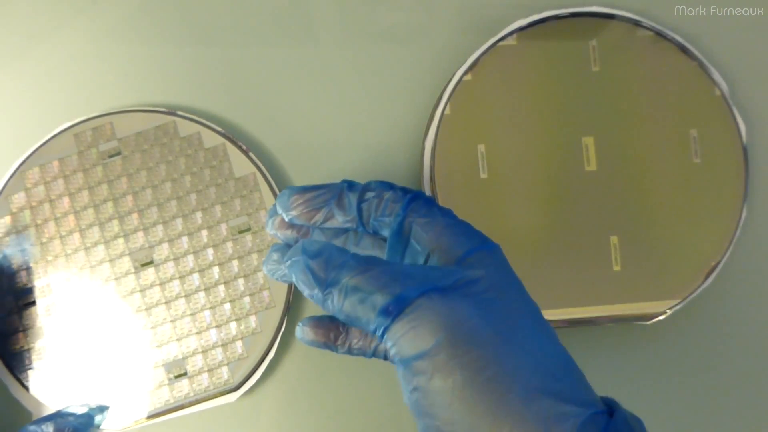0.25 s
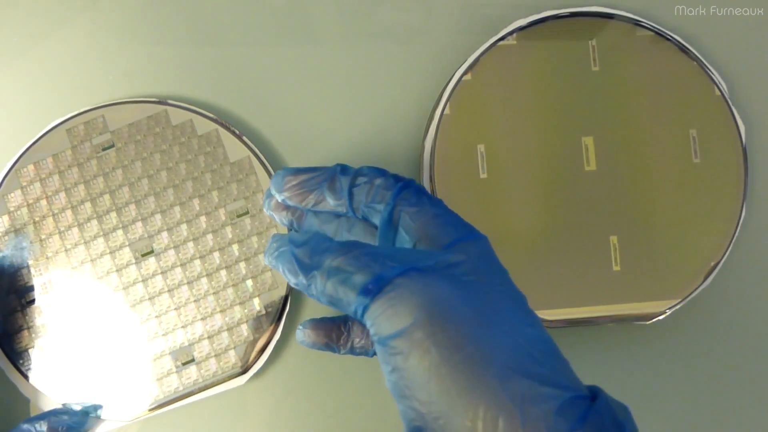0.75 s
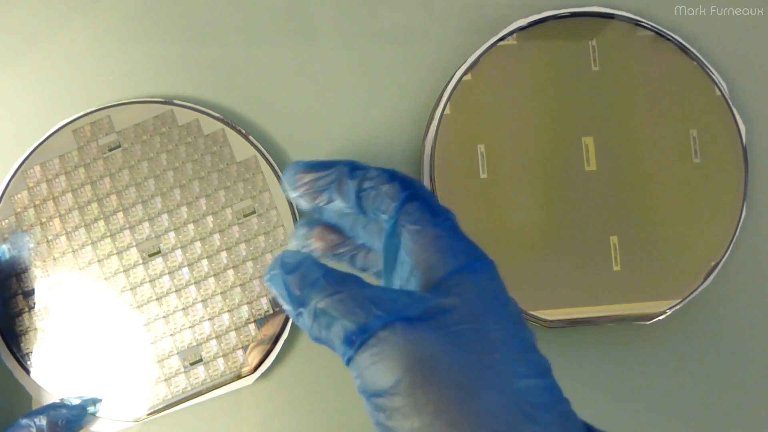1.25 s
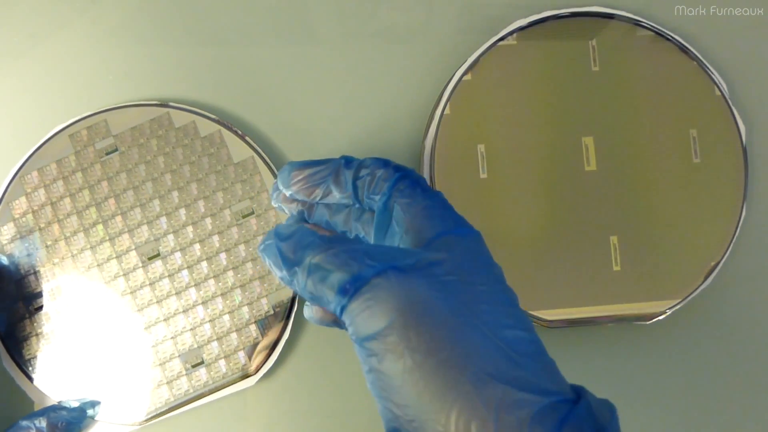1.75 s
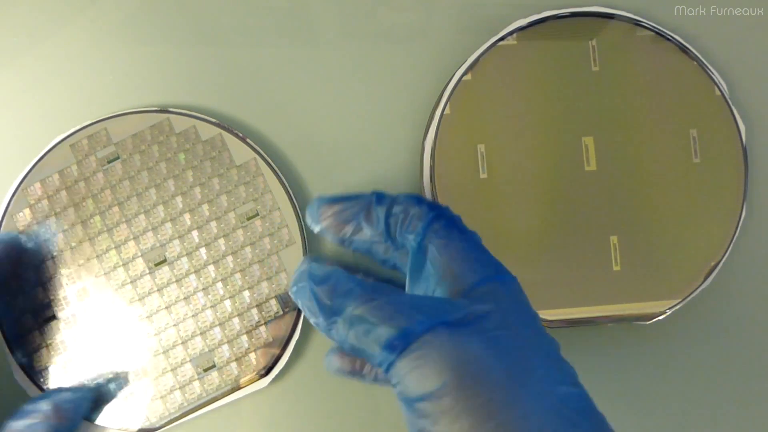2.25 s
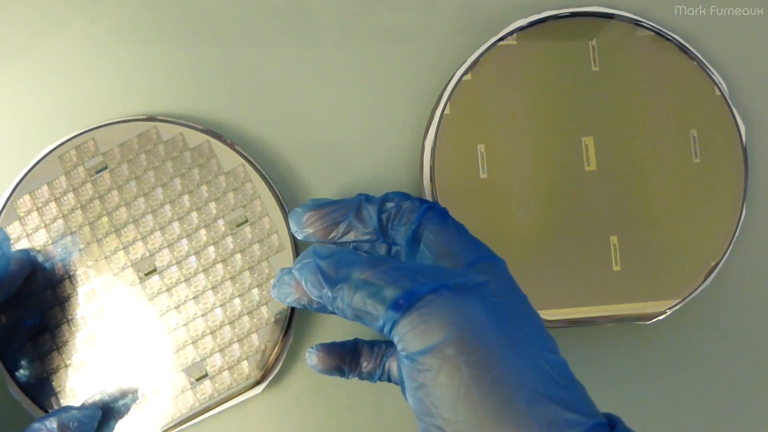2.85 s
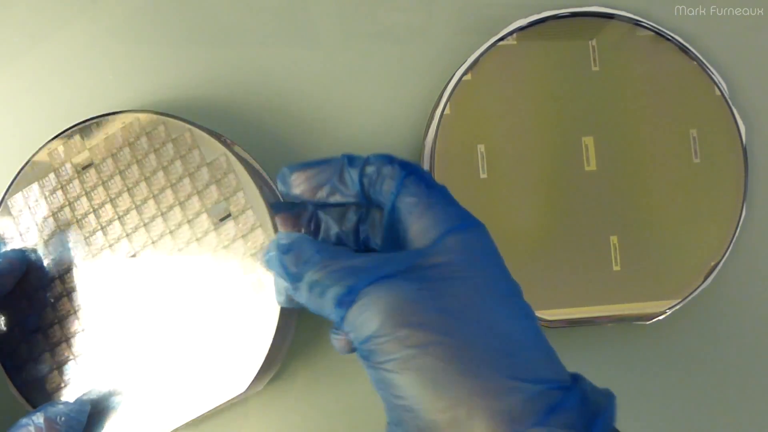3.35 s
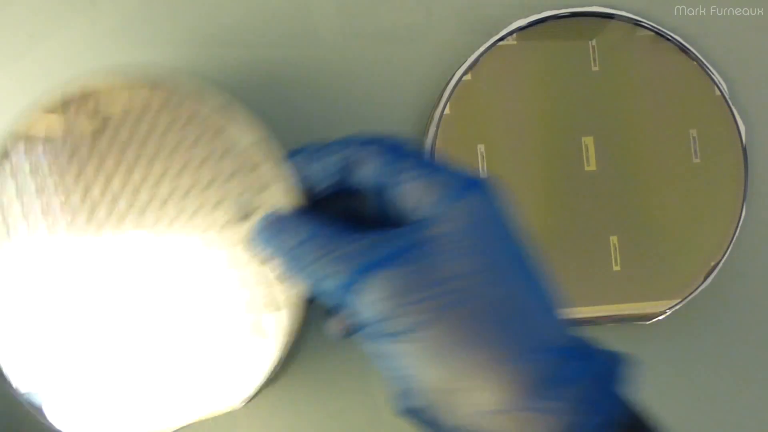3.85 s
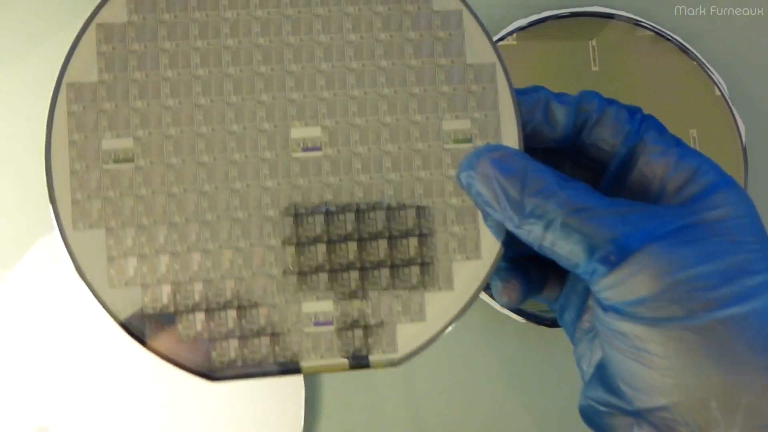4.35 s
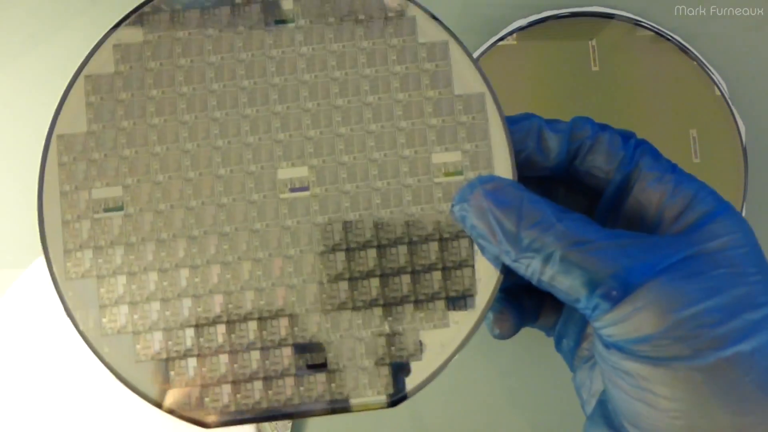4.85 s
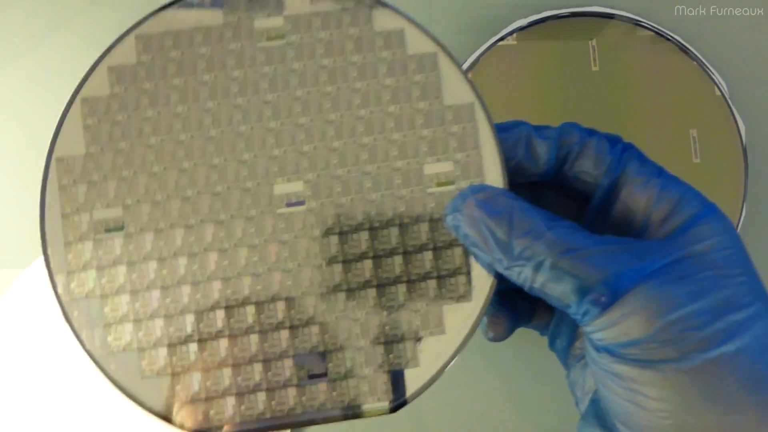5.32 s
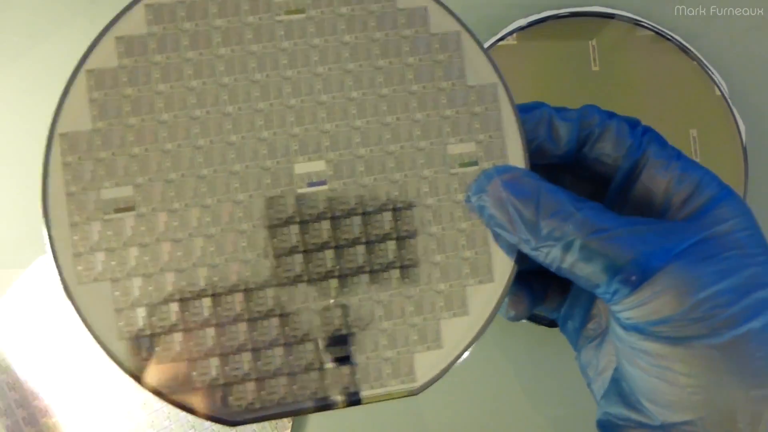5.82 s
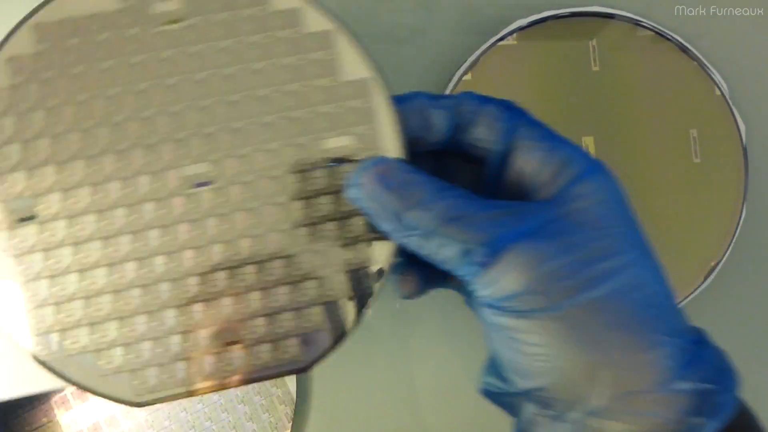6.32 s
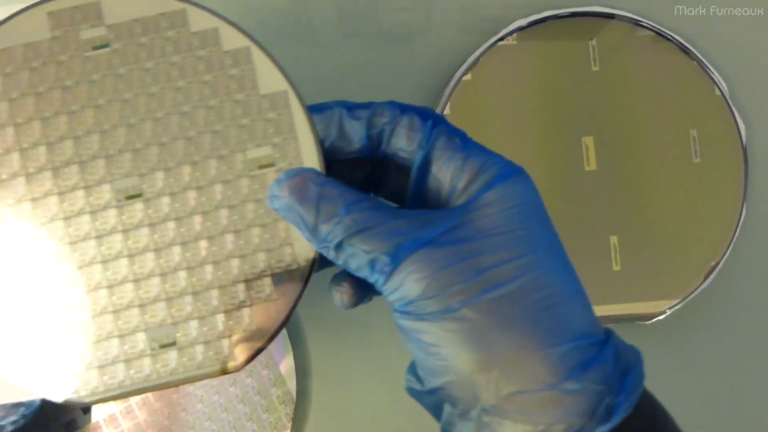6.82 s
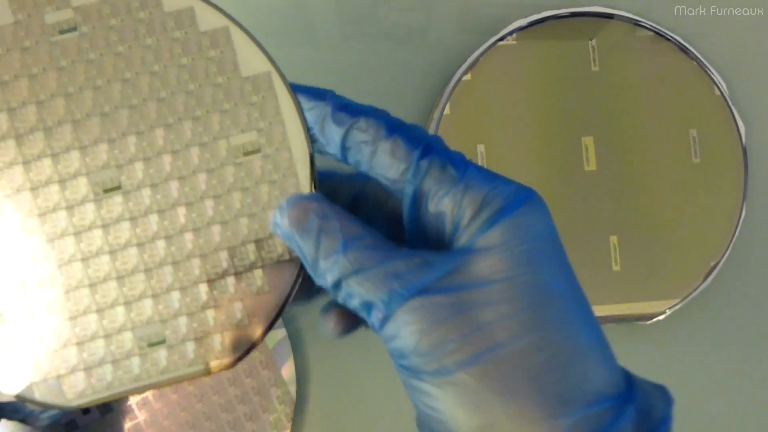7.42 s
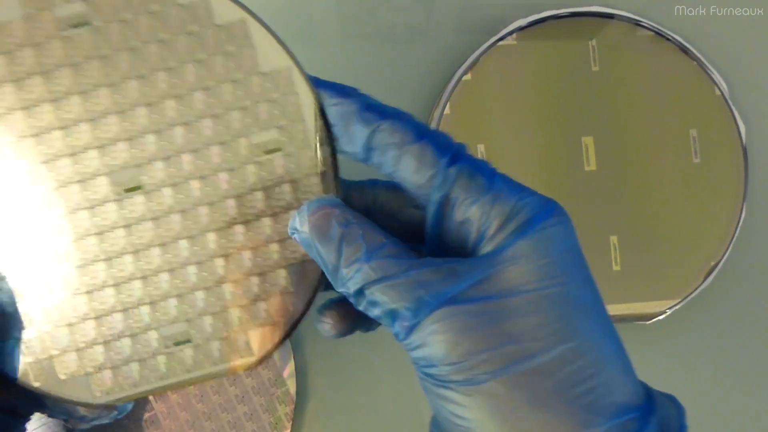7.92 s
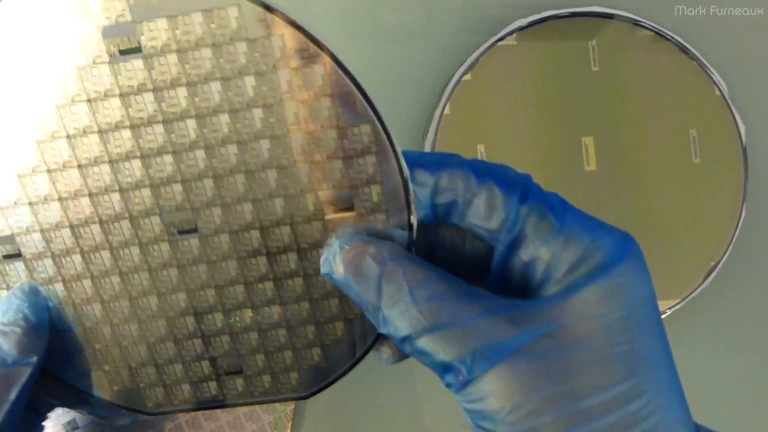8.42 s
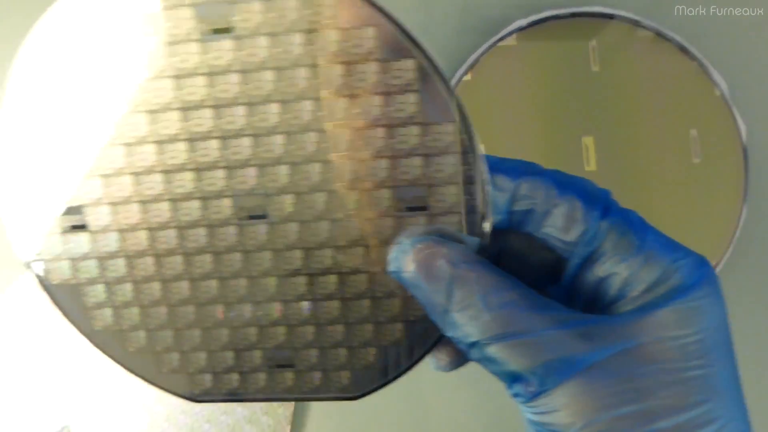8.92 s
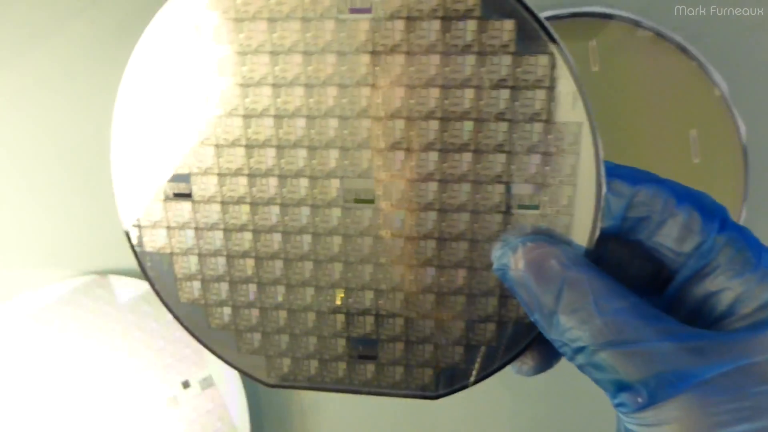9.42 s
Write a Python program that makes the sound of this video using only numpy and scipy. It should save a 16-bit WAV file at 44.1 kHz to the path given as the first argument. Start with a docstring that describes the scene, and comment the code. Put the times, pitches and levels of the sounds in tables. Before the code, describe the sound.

A small, fairly dry indoor space with deep rumble, low wavering mains hum and soft wide hiss throughout. Nothing else until about 0.8 s, when a thin plastic glove gives a quick crisp rustle against a silicon wafer. Soft rubs and a dull tap follow to 1.6 s, a brighter brush at 1.8 and a gentle slide around 2.3. Small ticks come near 2.8, then a cluster of crinkles, scrapes and taps from 3.1 to 4.1 as the wafer is lifted. A strong crackly brush lands at 4.6, sharp knocks at 5.0 and 5.2, and a crisp glove slide at 5.4-5.7. Faint rubs lead to a knock at 6.5 and longer rustling until 7.2. Lighter brushes and ticks continue, with a clear click at 8.9, while a low drone swells around 8 s, then recedes to the end near 9.7.

```python
"""A room rumbles, hums and hisses throughout, made from shaped noise and wavering sine tones.
From about 0.8 s a hand in a thin plastic glove slides a silicon wafer off its tray and turns it:
each rub is a dense run of tiny slips that sound in the glove film, the wafer and the tray.
From 1.3 s single creases and taps snap in between, each a short ring with a crack of noise.
A low drone swells to its loudest near 8 s and sinks again as the last rubs pass."""
import sys
import numpy as np
from scipy import signal
from scipy.fft import rfft, irfft, next_fast_len
from scipy.io import wavfile
from scipy.ndimage import uniform_filter1d

SR = 44100
rng = np.random.default_rng(int(sys.argv[2]) if len(sys.argv) > 2 else 0)


def to_wav(s):
    """Save 16-bit WAV."""
    ch = np.atleast_2d(s).T  # columns
    pcm = np.round(np.clip(ch, -1, 1) * 32767)  # PCM
    wavfile.write(sys.argv[1], SR, pcm.astype(np.int16))


N = 426447  # length in samples, about 9.7 s


def gain_of(db):
    """Turns decibels into a plain multiplier."""
    return 10 ** (np.asarray(db) / 20)


def evened(x):
    """Scales a signal to an average (rms) level of one."""
    return x / np.sqrt(np.mean(x ** 2) + 1e-20)


def read(points, hz):
    """Reads a curve of (pitch, value) points, spacing pitch as the ear does."""
    f, value = np.transpose(points)
    return np.interp(np.log(hz + 1), np.log(f + 1), value)


def follow(rows):
    """Joins curve rows into one value a sample, for each column after the time."""
    s, *columns = np.transpose(rows)
    return [np.interp(np.arange(N) / SR, s, column) for column in columns]


def resonate(x, hz, width):
    """Shifts hz down to zero, smooths, and shifts back: a resonance of gain 1."""
    turn = np.exp(2j * np.pi * np.cumsum(hz * np.ones(len(x))) / SR)
    r = np.exp(-np.pi * width / SR)
    return 2 * (turn * signal.lfilter([1 - r], [1, -r], x / turn)).real


def add(mix, s, sound):
    """Mixes a sound in at s seconds, cut off at the end of the scene."""
    part = mix[:, round(s * SR):][:, :sound.shape[1]]
    part += sound[:, :part.shape[1]]


RUMBLE_DB = -41.5  # overall level
# how the rumble's strength is spread over pitch: pitch_hz, relative level_db (per Hz)
RUMBLE_SHAPE = [(5, 14), (18, 18.5), (27, 4), (40, -28), (60, -53)]


def rumble():
    """The building's lowest shaking: shaped noise, the same at both microphones."""
    size = next_fast_len(N)
    hz = np.fft.rfftfreq(size, 1 / SR)
    shaped = rfft(rng.standard_normal(size)) * gain_of(read(RUMBLE_SHAPE, hz))
    return gain_of(RUMBLE_DB) * evened(irfft(shaped, size)[:N])


AIR_DB = -52.5  # overall level
# how room noise and hiss are spread over pitch: pitch_hz, relative level_db (per Hz)
AIR_SHAPE = [(40, -11), (60, -2.5), (105, -13), (135, -11.5), (190, -17), (260, -15.5), (390, -24.5),
             (460, -23.5), (640, -29.5), (1150, -31), (2200, -40.5), (16000, -45.5)]
# how alike left and right are: pitch_hz, likeness (0 unrelated, 1 the same)
LIKENESS = [(130, 0.99), (400, 0.93), (1000, 0.74), (3000, 0), (7000, 0)]


def air(patchy_db=0.5):
    """Room noise over the hiss of the microphones: alike in the bass, unrelated in the treble."""
    frames, hz = N // 512 + 5, np.fft.rfftfreq(2048, 1 / SR)
    a, b, c, d, patches = rng.standard_normal((frames, len(hz), 5)).T
    # the level varies slightly in patches about 340 Hz wide and 0.09 s long
    patches = evened(uniform_filter1d(uniform_filter1d(patches, 16, 0), 8, 1))
    same = np.clip(read(LIKENESS, hz), -1, 1)[:, None]
    left = a + 1j * b
    right = same * left + np.sqrt(1 - same ** 2) * (c + 1j * d)
    spectrum = np.array([left, right])
    spectrum *= gain_of(read(AIR_SHAPE, hz)[:, None] + patchy_db * patches)
    noise = signal.istft(spectrum, nperseg=2048, noverlap=1536)[1][:, :N]
    return gain_of(AIR_DB) * evened(noise)


# wavering mains hum and a higher tone: pitch_hz, width_hz, level_db
HUMS = [(59.25, 6.1, -57), (460.6, 4, -73.5)]
# path of the drone, before its level wavers: time_s, pitch_hz, level_db
DRONE = [(0, 134.7, -62.5), (1.4, 143, -61.5), (2.3, 114.6, -59.5), (3.9, 140.7, -61), (6.6, 138, -59.5),
         (7.3, 138.1, -52), (8.1, 136.1, -49), (8.9, 137.1, -53.5), (9.67, 140.3, -58.5)]


def hum(steady=1.4, waver_db=1.84):
    """A gliding drone, plus tones that waver because each sine has narrow noise around it."""
    t = np.arange(N) / SR
    drone_hz, drone_db = follow(DRONE)
    waver = evened(uniform_filter1d(rng.standard_normal(N), 5000))
    drone = np.sqrt(2) * np.sin(2 * np.pi * np.cumsum(drone_hz) / SR)
    out = gain_of(drone_db + waver_db * waver) * drone
    for hz, width, db in HUMS:
        fuzz = evened(resonate(resonate(rng.standard_normal(N), hz, width), hz, width))
        out += gain_of(db) * evened(fuzz + steady * np.sin(2 * np.pi * hz * t))
    return out


def bench(x, t60=0.053, wet_db=-4.5, lead_s=4.5e-5, scatter_s=2.5e-5, left_db=0.7):
    """Left hears the hand louder and usually first; lead and echoes are drawn for each sound."""
    t = np.arange(4096) / SR
    taps = rng.standard_normal((2, len(t))) * gain_of(-60 * t / t60) * (t > .001)
    taps *= gain_of(wet_db) / np.linalg.norm(taps, axis=1, keepdims=True)
    lead = (lead_s + scatter_s * rng.standard_normal()) * SR
    # direct sound: a smooth click can sit between two samples; 16 samples of room are cut below
    taps[:, :32] += np.sinc(np.arange(32) - 16 - np.array([[0], [lead]]))
    sides = gain_of([[left_db / 2], [-left_db / 2]])
    return signal.fftconvolve(x[None], taps, axes=1)[:, 16:] * sides


# creases and taps, before the echoes:
# start_s, ring level_db, ring pitch_hz, lowest partial's 60 dB fade_s (before rattle), crack level_db
SNAPS = [(1.3364, -47, 1060, 0.03, -66), (1.796, -56, 3600, .03, -49), (2.79, -44.5, 2420, 0.021, -64),
         (2.861, -61, 3350, 0.025, -49), (3.436, -45, 1110, 0.012, -55), (3.544, -47, 5700, 0.068, -63),
         (4.076, -50, 5770, 0.039, -45), (4.966, -43.5, 1150, 0.017, -52), (5.204, -42, 1240, 0.02, -37.5),
         (5.385, -47, 2480, 0.011, -58), (5.41, -48, 245, 0.06, -50), (6.491, -42, 950, 0.05, -48.5),
         (6.704, -54, 1160, .04, -60), (6.752, -48, 820, 0.073, -62), (7.826, -47.5, 993, 0.09, -51),
         (8.141, -66, 7010, 0.014, -49.5), (8.191, -75, 2500, 0.013, -49), (8.899, -44, 3940, 0.014, -40.5)]


def snaps(partials=((1, 0), (1.63, -9.), (2.08, -6.)), crack_t60=0.03, rattle_hz=706.0,
          rattle_s=0.00203):
    """A short, rattling ring of partials (ratio, dB), with a crack that dies at least as fast
    as the lowest of them."""
    out, t = np.zeros((2, N)), np.arange(3000) / SR
    noise = signal.lfilter([1, -.3], 1, rng.standard_normal((len(SNAPS), len(t))))
    for (s, ring_db, hz, t60, crack_db), hiss in zip(SNAPS, noise):
        ring = sum(gain_of(db - 60 * ratio * t / t60) * np.sin(2 * np.pi * ratio * hz * t)
                   for ratio, db in partials)
        rough = rattle_hz / (rattle_hz + hz)  # low knocks rattle, high ticks ring clear
        rattle = evened(uniform_filter1d(hiss[::-1], round(rattle_s * SR)))
        ring = ring * (1 - rough + rough * rattle)
        crack = gain_of(crack_db - 60 * t / min(t60, crack_t60)) * hiss
        add(out, s, bench(gain_of(ring_db) * ring + crack))
    return out


def slips(per_s, spread_db, clump_db):
    """Stick-slip clicks of random sign and size that come in clumps of some milliseconds."""
    size = gain_of(spread_db * np.minimum(rng.exponential(1, N), 5)) * rng.choice([-1, 1], N)
    clumps = evened(uniform_filter1d(rng.standard_normal(N), 500))
    happens = rng.random(N) < per_s / SR
    return evened(size * happens * gain_of(clump_db * clumps))


def body(hz, modes):
    """Power response of a rubbed thing: steep resonances, scaled to a mean of one."""
    power = sum(gain_of(2 * db) / (1 + (2 * (hz - f) / w) ** 2) ** 2 for f, w, db in modes)
    return power / power.mean()


MID_GRIP_HZ = 3680  # middling pitch of the gripped wafer
# the tray follows the wafer's level, more so when the grip is low
TRAY_DB, TRAY_DB_PER_OCTAVE = -12, -8
LINGER = 0.98  # shape of the fall: 1 even in dB, 2 bell-like
# short brushes of a finger, before the bodies and echoes:
# peak_s, rise_s, fall_s, glove film level_db, wafer level_db, gripped wafer pitch_hz
BRUSHES = [(.955, 0.012, 0.015, -77, -67, 3750), (1.04, 0.007, 0.31, -63, -69.5, 4500),
           (1.191, 0.062, 0.032, -56.5, -61.5, 3600), (1.309, 0.03, 0.013, -56, -64, 8700),
           (1.395, 0.036, 0.05, -61.5, -60, 3870), (1.544, 0.025, 0.035, -85, -64, 3670),
           (1.823, 0.018, 0.025, -56, -53.5, 3680), (2.022, 0.073, 0.17, -66, -64, 7150),
           (2.473, 0.032, .026, -56.5, -65.5, 8050), (3.139, 0.032, 0.077, -65, -64, 4680),
           (3.226, 0.057, 0.027, -57, -57.5, 3730), (3.349, 0.059, 0.059, -59, -59.5, 4360),
           (3.451, .028, 0.021, -50.5, -56.5, 4140), (3.561, 0.036, 0.054, -61.5, -55.5, 5740),
           (3.64, 0.04, 0.092, -56.5, -64.5, 2390), (3.76, 0.027, 0.063, -66, -70, 6000),
           (3.987, 0.078, 0.081, -62, -63.5, 8400), (4.081, 0.005, 0.063, -59, -67, 5700),
           (4.565, 0.029, 0.035, -59, -48.5, 3400), (4.583, .03, 0.025, -45.5, -46, 5500),
           (4.751, 0.05, 0.023, -63.5, -61, 3340), (4.891, 0.032, 0.16, -62.5, -62, 3420),
           (5.212, 0.021, 0.036, -52, -58, 2650), (5.846, 0.013, 0.013, -72, -60.5, 2650),
           (5.909, 0.017, 0.027, -78, -63.5, 2580), (6.001, 0.024, 0.019, -65, -55.5, 2250),
           (6.15, 0.019, 0.03, -80, -68, 2000), (6.872, 0.01, 0.007, -49, -56.5, 4520),
           (6.925, 0.005, 0.0096, -68, -56, 4270), (7.687, 0.055, 0.048, -57, -55.5, 5240),
           (7.939, 0.037, 0.021, -66, -62, 2560), (8.48, 0.057, .016, -64, -59, 6430),
           (8.781, 0.081, 0.042, -55, -58.5, 4970), (8.92, 0.015, 0.013, -68, -58, 4200),
           (9.204, 0.034, 0.036, -70, -63.5, 3360)]


def brush(s, rise, fall, film_db, wafer_db, grip_hz):
    """A quick swell and a fade, 10 dB down a rise or fall away, shared by film, wafer and tray."""
    t = np.arange(-2 * rise, 3 * fall, 1 / SR)
    swell_db = -10 * np.where(t < 0, (t / rise) ** 2, abs(t / fall) ** LINGER)
    tray_db = wafer_db + TRAY_DB + TRAY_DB_PER_OCTAVE * np.log2(grip_hz / MID_GRIP_HZ)
    levels = gain_of(swell_db + np.array([[film_db], [wafer_db], [tray_db]]))
    return [(s + t[0], levels, grip_hz)]


TOUCH_S = 0.002  # a slide fades in and out over this time
SHIFT_S = .06  # a sliding hand finds new spots this often
# long slides of the hand, before the bodies and echoes: middle pitch_hz of the gripped wafer,
# its wander_octaves from spot to spot, then a path of
# (time_s, glove film level_db, wafer level_db, tray level_db)
SLIDES = [(8200, 0.11, [(0.825, -66, -68, -68), (0.835, -55, -56, -67), (0.891, -51, -61, -77),
          (1.03, -84, -87, -84)]), (3600, 0.39, [(2.178, -60.5, -75, -71), (2.304, -53.5, -61.5, -75),
          (2.38, -63, -86, -87)]), (5360, .03, [(4.15, -72, -80, -77), (4.196, -62.5, -62, -91),
          (4.378, -63.5, -63, -73), (4.5, -72, -61, -73), (4.53, -75, -77, -66)]),
          (4350, 0.32, [(5.41, -67, -72, -67), (5.424, -52.5, -67, -70), (5.48, -45.5, -60, -65.5),
          (5.538, -63, -70, -69), (5.566, -56.5, -62, -75), (5.638, -51.5, -63, -69),
          (5.69, -56.5, -69, -72), (5.73, -70, -72, -73)]), (4480, 0.31, [(6.51, -67, -74, -69),
          (6.56, -58.5, -68, -70), (6.622, -63.5, -68, -66.5), (6.76, -54.5, -63, -67),
          (7.05, -58, -62, -72), (7.11, -68, -70, -79), (7.142, -60.5, -64, -91), (7.216, -65, -85, -94)]),
          (4830, 0.12, [(7.425, -61, -68, -95), (7.564, -59, -60.5, -80), (7.62, -72, -72, -77)])]


def slide(grip_hz, wander, rows):
    """Film, wafer and tray follow their own levels; the contact cross-fades from spot to spot."""
    s, *levels_db = np.transpose(rows)
    t, hop = np.arange(s[0], s[-1], 1 / SR), round(SHIFT_S * SR)
    touch = np.clip(np.minimum(t - s[0], s[-1] - t) / TOUCH_S, 0, 1)
    levels = touch * gain_of([np.interp(t, s, db) for db in levels_db])
    levels = np.pad(levels, ((0, 0), (hop, 2 * hop)))
    fade = np.sin(np.pi * np.arange(2 * hop) / (2 * hop))
    spots = []
    for k in range(0, len(t) + hop, hop):
        spot_hz = grip_hz * 2 ** (wander * rng.standard_normal())
        spots.append((s[0] + (k - hop) / SR, levels[:, k:k + 2 * hop] * fade, spot_hz))
    return spots


SPOTS = 3  # places of the hand that slip at once
# broad fizz of the glove: pitch_hz, width_hz, relative level_db
FILM = [(8840, 4800, -1.5), (12060, 7400, 1.5)]
# the wafer's free modes, before the hand damps them: pitch_hz, width_hz, relative level_db
WAFER = [(3630, 830, 0.5), (5290, 5300, 1.5)]
# resonances of the tray: pitch_hz, width_hz, relative level_db
TRAY = [(1174, 450, 9.5), (2300, 890, 0.5)]


def rubbing(grip_width_hz=570.0, grip_db=7.5, damp_db_per_octave=0.5, sing_db_per_octave=2.5,
            folds_db=2.0, fold_hz=509.0):
    """The slips of each stroke sound at several spots of the hand, through film, wafer and tray."""
    drives = [slips(per_s=4000, spread_db=3.0, clump_db=2.5) for _ in range(SPOTS)]
    out = np.zeros((2, N))
    strokes = sum([brush(*row) for row in BRUSHES] + [slide(*row) for row in SLIDES], [])
    for start, levels, grip_hz in strokes:
        size = next_fast_len(levels.shape[1])
        hz = np.fft.rfftfreq(size, 1 / SR)
        # the grip damps modes far from its own pitch
        wafer = [(f, w, db - damp_db_per_octave * abs(np.log2(grip_hz / f))) for f, w, db in WAFER]
        # a tight, high grip sings more
        sing_db = grip_db + sing_db_per_octave * np.log2(grip_hz / MID_GRIP_HZ)
        wafer = wafer + [(grip_hz, grip_width_hz, sing_db)]
        bodies = np.sqrt([body(hz, modes) / SPOTS for modes in (FILM, wafer, TRAY)])
        for drive in drives:
            # creases colour each spot
            folds_curve = np.interp(hz / fold_hz, np.arange(99), rng.standard_normal(99))
            folds = gain_of(folds_db * folds_curve)
            rub = drive[round(start * SR):][:levels.shape[1]] * levels
            sounding = (rfft(rub, size) * bodies).sum(0) * folds
            add(out, start, bench(irfft(sounding, size)))
    return out


def scene():
    """The room's background, then the snaps and the rubbing hand, added together."""
    return rumble() + air() + hum() + snaps() + rubbing()


EDGE_HZ = 15830  # highest pitch that the camera passes


def record(dry):
    """The band limit of the camera: a steep filter takes away the highest treble."""
    lowpass = signal.firwin(1023, EDGE_HZ, window=("kaiser", 9), fs=SR)
    return signal.oaconvolve(dry, lowpass[None], "same")


dry = scene()
out = record(dry)
to_wav(out)
```